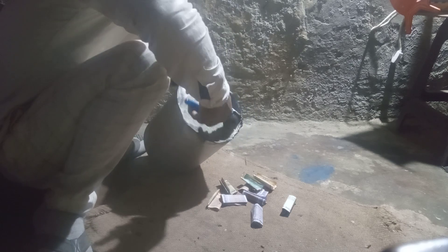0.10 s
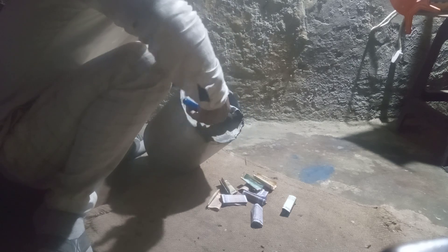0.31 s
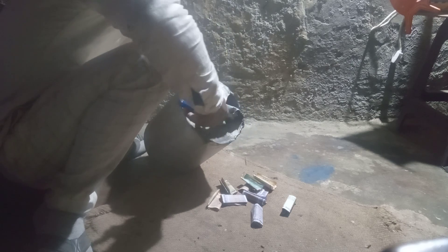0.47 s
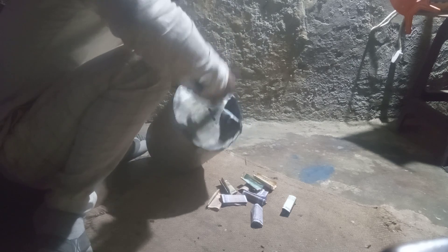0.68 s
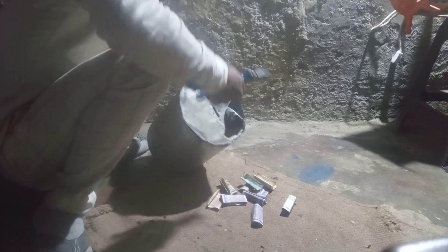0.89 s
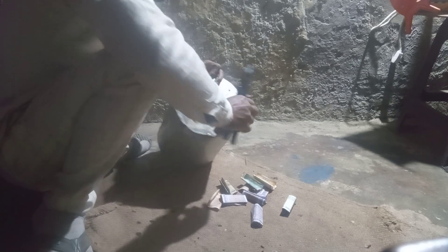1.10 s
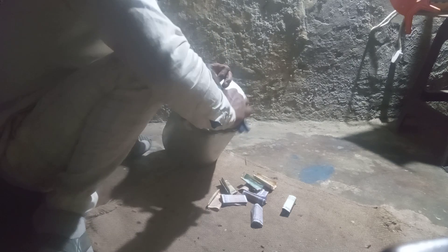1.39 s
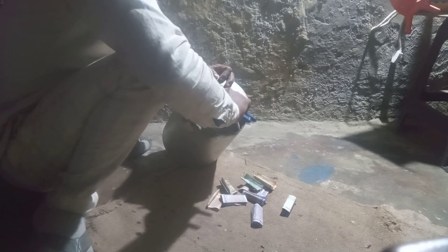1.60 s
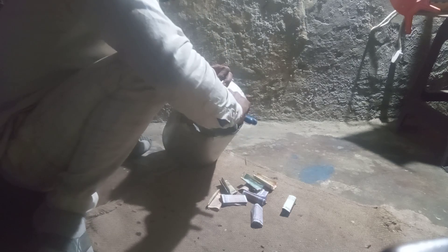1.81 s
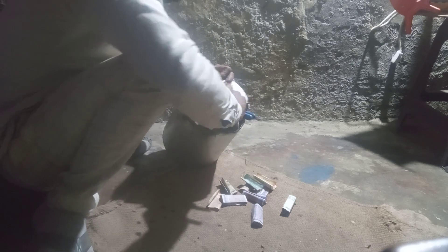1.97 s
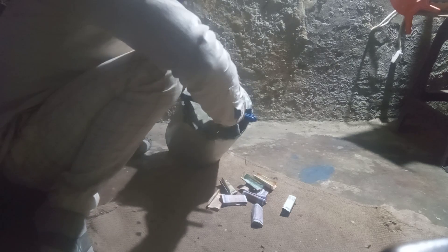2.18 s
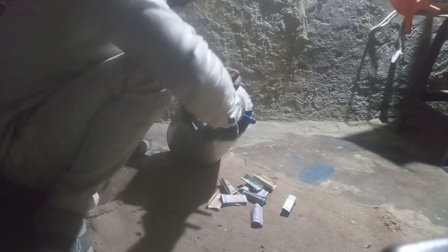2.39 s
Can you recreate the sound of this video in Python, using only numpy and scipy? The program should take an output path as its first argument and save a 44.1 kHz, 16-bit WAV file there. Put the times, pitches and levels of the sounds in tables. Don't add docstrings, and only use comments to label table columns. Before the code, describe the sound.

A thin metal can is pried: quick scrapes, then a louder clanking snap, a long gap with only faint touches, and one more clank near the end; small hard room, fan hum, narrow phone microphone.

```python
import sys
import numpy as np
from scipy import signal
from scipy.fft import rfft, irfft, next_fast_len
from scipy.io import wavfile
from scipy.ndimage import uniform_filter1d, map_coordinates

SR = 44100
rng = np.random.default_rng(int(sys.argv[2]) if len(sys.argv) > 2 else 0)


def store_pcm(level_fs):
    pcm = np.round(np.clip(level_fs, -1, 1) * 32767).astype(np.int16)
    wavfile.write(sys.argv[1], SR, np.atleast_2d(pcm).T)


def voltage_ratio(level):
    return 10 ** (np.asarray(level, float) / 20)


N = 110250

# [f/Hz, level/dB]
AIR_HISS = [(25, -59.5), (70, -30), (150, -6.5), (300, -5), (1400, -7.5), (2000, -15.5), (4000, -22),
            (7000, -25.5)]
# [f/Hz, width/Hz, level/dB]
AIR_HUMPS = [(290, 66, 3), (1247, 176, 3)]
AIR_GRAIN = 1024, 5, 8
# [f/Hz, level/dB]
MAINS_LINES = [(200, -64), (500, -62.5), (700, -62), (1000, -61), (1200, -59.5), (1300, -63)]
# [multiple of shaft rate, level/dB]
SHAFT_LINES = [(4, -58), (5, -57), (6, -62), (8, -60), (9, -62), (17, -64)]

# [f/Hz, width/Hz, level/dB]
TONES_A = [(191.3, 6.6, 3), (308, 44, 4), (653, 30, -4.5), (792, 30, -2), (940, 20, -4), (1239, 23, -3),
           (1535, 81, -4.5), (2238, 44, -12.5), (2380, 41, -28.5), (3420, 200, -15)]
TONES_B = [(191.1, 6.2, 8.5), (279, 25, 0.5), (329, 29, 4.5), (517.4, 12, -3), (692, 35, -2), (933, 28, -2),
           (1274, 120, -9.5), (1800, 56, -15.5), (2100, 30, -12), (2500, 130, -11.5), (2990, 48, -8.5)]
TONES_C = [(180, 8.7, 1), (334, 46, 2), (426, 12, 0.5), (729, 66, -4), (778, 52, -3), (960, 7, 7),
           (1340, 47, 0.5), (1710, 180, -11.5), (2116, 26, -12.5), (2890, 38, -17.5), (3200, 120, -16.5),
           (4815, 73, -18)]
TONES_D = [(266.9, 6.7, 5.5), (328.5, 27, -1), (756, 68, -4), (937, 36, 6.5), (965, 22, 5),
           (1297, 25, -3.5), (1507, 30, -11), (1700, 13, -5), (1790, 38, -7), (2205, 42, -9),
           (2344, 21, -11), (2670, 47, -11), (2590, 87, -33), (3590, 220, -19)]
TONES_E = [(333, 45, 6), (407, 90, -5), (833, 13, -7), (903, 65, -5.5)]
TONES_F = [(166.7, 14, -2.5), (267, 22.5, 6), (308, 52, -3), (645, 24, -3), (750, 55, -10), (1315, 66, -10),
           (1536, 11, -1.5), (1730, 26, -9.5), (2261, 60, -14.5), (2720, 140, -21.5), (3280, 210, -20.5)]
TONES_G = [(182, 34, 3.5), (320, 14, -7.5), (630, 12, -1.5), (733, 66, -14), (868, 19, -2), (1130, 42, -6),
           (1445, 60, -2)]
TONES_H = [(393, 33, -4.5), (956, 49, -8), (1218, 21, 5), (1560, 60, -21.5)]
# [t/s, level/dB, rise/s, scrape length/s, rattle over ring/dB]
CONTACTS_A = [
    (0.222, -25, 0.0017, 0.02, -7),
    (0.247, -27.5, .012, 0.046, -6.5),
]
CONTACTS_B = [
    (.29, -28, .025, .035, -6.5),
    (.328, -24, .016, 0.043, -6.5),
]
CONTACTS_C = [
    (.594, -26, .005, 0.025, -6),
    (.628, -25, .012, 0.075, -11),
]
CONTACTS_D = [
    (.668, -23.5, 0.0049, 0.049, -20.5),
    (.692, -19, 0.00081, 0.027, -2.5),
    (.738, -33, 0.0074, 0.011, -0.5),
]
CONTACTS_E = [
    (1.405, -40.5, .035, 0.058, -9),
    (1.516, -51, .005, 0.011, -1.5),
]
CONTACTS_F = [
    (2.121, -33.5, 0.00086, 0.019, -1),
    (2.124, -24.5, .007, .022, -15.5),
    (2.166, -34.5, .006, 0.026, -4.5),
]
CONTACTS_G = [
    (2.074, -34, .006, 0.021, -12.5),
    (2.477, -41.5, .012, .03, -3),
]
CONTACTS_H = [
    (1.302, -43.5, .01, 0.0075, -10.5),
    (1.378, -50.5, .008, 0.075, -5.5),
]
# brightness of the rattle, one value a shape [tilt/dB per octave]
RATTLE_TILTS = [-1.5, -2.55, -2.5, 0.03, -4, -4, -5, 0.5]
# highest pitch its contacts drive, one value a shape [f/Hz]
SOFTNESS = [4100, 3500, 4900, 5870, 2000, 2500, 1300, 2500]
# [f/Hz, level/dB]
RATTLE_COLOUR = [(60, -32), (150, 2), (300, -2), (550, -5.5), (1100, 2.5), (2200, -3), (4500, -8),
                 (7500, -13)]
RATTLE_GRAIN = 256, 2, 6
# [f/Hz, T60/s]
ROOM_DECAY = [(100, 0.54), (300, 0.26), (1000, .24), (3000, 0.23), (7000, 0.17)]

# [t/s, level/dB, f/Hz, width/Hz, T60/s]
WALL_THUD = (0.5, -58.5, 85.5, 12.5, 5.3)


def unit(x):
    return x / np.sqrt(np.mean(x ** 2) + 1e-20)


def along(points, hz):
    f, v = np.transpose(points)
    return np.interp(np.log(hz + 1), np.log(f + 1), v)


def wobble(rate):
    knots = rng.standard_normal(int(N * rate / SR) + 4)
    return map_coordinates(knots, [np.arange(N) * rate / SR])


def filtered(x, response):
    m = next_fast_len(len(x) + SR // 2)
    return irfft(rfft(x, m) * response(np.fft.rfftfreq(m, 1 / SR)), m)[:len(x)]


def patchy(count, size, across, lasting, depth_db):
    z = signal.stft(rng.standard_normal(count + size), nperseg=size)[2]
    field = uniform_filter1d(rng.standard_normal(z.shape), size=across, axis=0)
    field = uniform_filter1d(field, size=lasting, axis=1)
    return signal.istft(z * voltage_ratio(depth_db * unit(field)), nperseg=size)[1][:count]


def fan():
    hiss_db, sway_db = -46, 0.5
    shaft_hz, hum_wobble_db = 69.55, 5

    def colour(hz):
        humps = sum(db * np.exp(-((hz - c) / w) ** 2) for c, w, db in AIR_HUMPS)
        return voltage_ratio(along(AIR_HISS, hz) + humps)

    air = unit(filtered(patchy(N, *AIR_GRAIN, depth_db=1.6), colour))
    t = np.arange(N) / SR
    hum = np.zeros(N)
    for hz, db in MAINS_LINES + [(k * shaft_hz, db) for k, db in SHAFT_LINES]:
        level = voltage_ratio(db + 1 + hum_wobble_db * wobble(6.16))
        hum += level * np.sin(2 * np.pi * hz * t + 0.72 * wobble(5))
    return voltage_ratio(hiss_db + sway_db * wobble(3.4)) * air + hum


def tool_force(t, rise, length):
    slips_per_s, scatter_db = 2500, 3
    extra_rise_s, let_go_s = 0.0012, 0.012
    catch_db, sharp_s = -3, 0.0078
    draw = rng.random((3, len(t)))
    slips = (draw[0] < slips_per_s / SR) * voltage_ratio(scatter_db * (2.8 * draw[1] - 2)) * np.sign(draw[2] - 0.5)
    grip = np.minimum(1, t / (rise + extra_rise_s)) * np.exp(-np.maximum(0, t - length) / let_go_s)
    force = slips * grip
    moment = np.arange(len(t)) == int(rise * SR)
    catch = moment * voltage_ratio(catch_db) / (1 + rise / sharp_s) * np.linalg.norm(force)
    return force, catch


def can_ring(push, tones, soft_hz):
    def response(f):
        modes = 0
        for k, (c, w, db) in enumerate(tones):
            modes = modes + (-1) ** k * voltage_ratio(db) * 1j * f * w / (c * c - f * f + 1j * f * w)
        return (soft_hz / (soft_hz + 1j * f)) ** 2 * modes

    ring = filtered(push, response)
    return ring / np.linalg.norm(ring)


def sheet_rattle(force, t, tilt_db):
    t60_s = 0.035
    energy = signal.fftconvolve(force ** 2, voltage_ratio(-120 * t / t60_s))[:len(t)]
    shake = np.sqrt(np.abs(energy))
    sheet = filtered(patchy(len(t), *RATTLE_GRAIN, depth_db=3.5),
                     lambda hz: voltage_ratio(along(RATTLE_COLOUR, hz) + tilt_db * np.log2((hz + 50) / 1000)))
    return shake * sheet / np.linalg.norm(shake * sheet)


def room_tail(build_s):
    hz, t, z = signal.stft(rng.standard_normal(SR // 2), SR, nperseg=128)
    decay = voltage_ratio(-60 * t / along(ROOM_DECAY, hz)[:, None])
    tail = signal.istft(z * decay, SR, nperseg=128)[1][:SR // 2]
    tail = tail * (1 - np.exp(-np.arange(len(tail)) / SR / build_s))
    return tail / np.linalg.norm(tail)


def contact(tones, tilt_db, soft_hz, rise, length, rattle_db):
    room_db, room_delay_s = -4.5, 0.0036
    t = np.arange(SR * 3 // 4) / SR
    force, catch = tool_force(t, rise, length)
    ring = can_ring(force + catch, tones, soft_hz)
    close = ring + voltage_ratio(rattle_db) * sheet_rattle(force, t, tilt_db)
    delayed = np.pad(close, (int(room_delay_s * SR), 0))
    wet = signal.fftconvolve(delayed, room_tail(build_s=0.0057))[:len(t)]
    return (close + voltage_ratio(room_db) * wet) * np.sqrt(SR / 20)


def can():
    out = np.zeros(N + SR)
    shapes = [TONES_A, TONES_B, TONES_C, TONES_D, TONES_E, TONES_F, TONES_G, TONES_H]
    pries = [CONTACTS_A, CONTACTS_B, CONTACTS_C, CONTACTS_D, CONTACTS_E, CONTACTS_F, CONTACTS_G, CONTACTS_H]
    for tones, contacts, tilt_db, soft_hz in zip(shapes, pries, RATTLE_TILTS, SOFTNESS):
        for s, db, rise, length, rattle_db in contacts:
            sound = contact(tones, tilt_db, soft_hz, rise, length, rattle_db)
            out[round(s * SR):][:len(sound)] += voltage_ratio(db) * sound
    return out[:N]


def thud():
    swell_s, lasts_s = 0.023, 0.52
    s, db, pitch_hz, width_hz, t60 = WALL_THUD
    t = np.maximum(0, np.arange(N) / SR - s)
    noise = rng.standard_normal(N)
    boom = unit(filtered(noise, lambda hz: np.exp(-((hz - pitch_hz) / width_hz) ** 2)))
    swell = 1 - np.exp(-t / swell_s)
    stop = 1 / (1 + (t / lasts_s) ** 12)
    return voltage_ratio(db - 60 * t / t60) * swell * stop * boom


def scene():
    low_cut_hz, top_hz, top_steepness = 77, 7310, 29.4
    thin_can = filtered(can(), lambda hz: (1j * hz / (low_cut_hz + 1j * hz)) ** 4)
    mix = fan() + thin_can + thud()
    return filtered(mix, lambda hz: 1 / (1 + (hz / top_hz) ** top_steepness))[None]


def top_cut(x):
    return signal.sosfilt(signal.butter(12, 8390, fs=SR, output="sos"), x)


def record(dry):
    end_hz = 8400
    mix = filtered(dry[0], lambda hz: hz < end_hz)[None]
    return top_cut(mix)


dry = scene()
out = record(dry)
store_pcm(out)
```